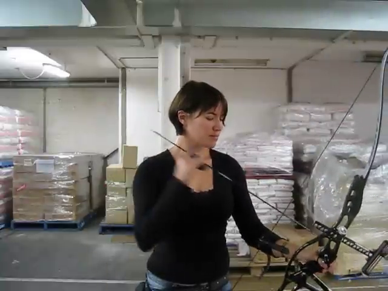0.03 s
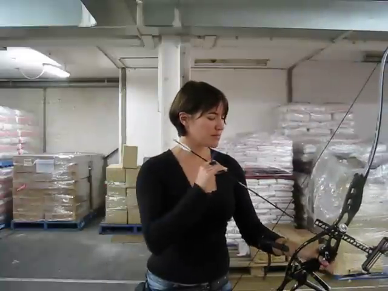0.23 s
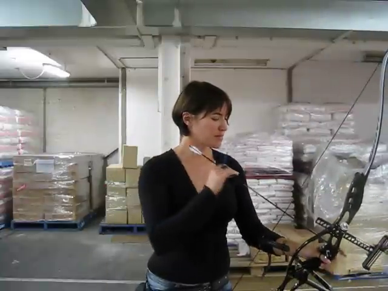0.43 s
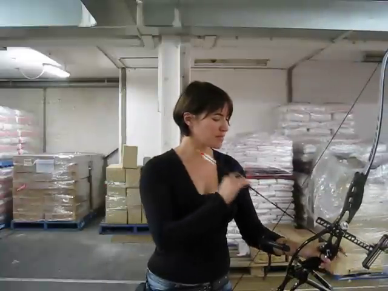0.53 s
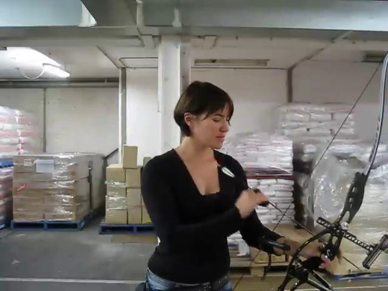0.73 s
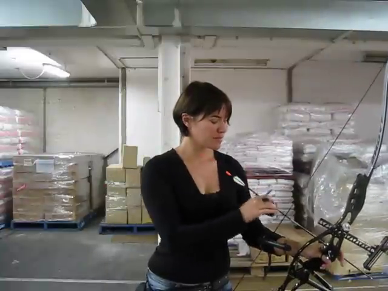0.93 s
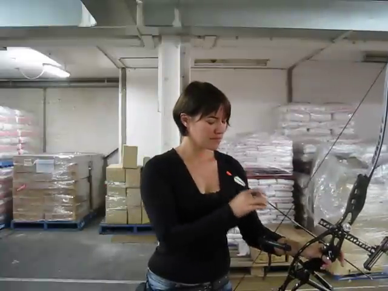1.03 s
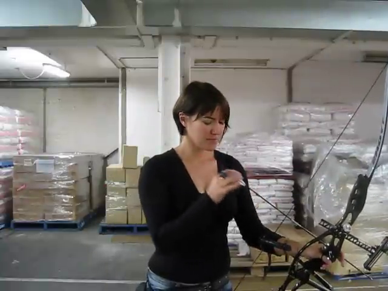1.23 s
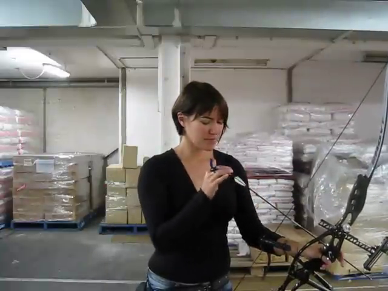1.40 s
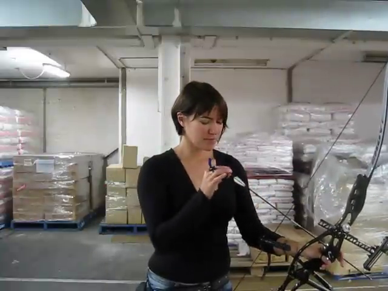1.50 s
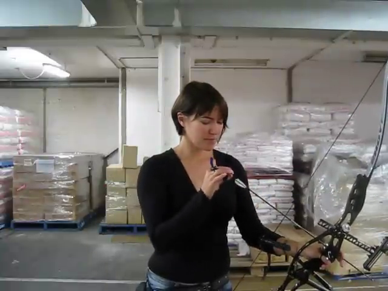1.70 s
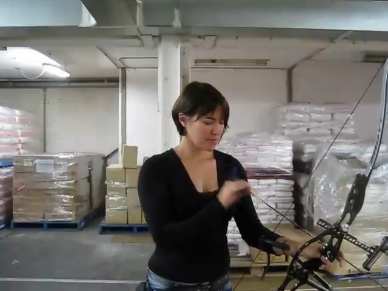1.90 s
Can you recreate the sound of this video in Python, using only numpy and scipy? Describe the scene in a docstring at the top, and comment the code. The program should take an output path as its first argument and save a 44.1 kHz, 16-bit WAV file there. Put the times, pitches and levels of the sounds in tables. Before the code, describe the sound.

Two sharp, close clacks of an arrow shaft hitting a bow and its metal rest ring out in a large warehouse. A brief rattle and two thin, faint scrapes of the shaft follow, over quiet, steady ventilation.

```python
"""Two sharp clacks, close to the microphone, over the hum of a large warehouse's ventilation:
an arrow shaft knocks against a compound bow. It drops onto the metal arrow rest, rattles,
and is slid along it twice with a thin hiss of friction. Each blow sets shaft, bow or rest ringing;
the hall rings on behind. On the hardest blows the recorder overloads with a low thump
and its limiter ducks."""
import sys
import numpy as np
from scipy import signal
from scipy.fft import rfft, irfft
from scipy.io import wavfile

SR = 44100
rng = np.random.default_rng(int(sys.argv[2]) if len(sys.argv) > 2 else 0)


def pcm_store(signal):
    """Save signal as 16-bit PCM."""
    levels = np.round(np.clip(np.atleast_2d(signal), -1, 1) * 32767)
    wavfile.write(sys.argv[1], SR, levels.astype(np.int16).T)


N = 85995
TIME = np.arange(N) / SR
BIN_HZ = np.arange(N // 2 + 1) * SR / N


def from_db(db):
    """Decibels to gain."""
    return 10 ** (np.asarray(db) / 20)


def unit_rms(x):
    """Scale to unit rms."""
    return x / np.sqrt(np.mean(x ** 2) + 1e-20)


def at_hz(points, hz, column=1):
    """Read a column of a table on a log-frequency axis."""
    table = np.array(points)
    return np.interp(np.log(np.maximum(hz, 1)), np.log(table[:, 0]), table[:, column])


def convolve(x, response):
    """Pass a sound through an impulse response."""
    return signal.fftconvolve(x, response)[:N]


def colour(x, points, size=8192):
    """Minimum-phase filter with the given spectral shape and unit power gain."""
    gain = unit_rms(from_db(at_hz(points, np.linspace(0, SR / 2, size // 2 + 1))))
    cepstrum = irfft(np.log(gain))
    cepstrum[1:size // 2] *= 2
    cepstrum[size // 2 + 1:] = 0
    return convolve(x, irfft(np.exp(rfft(cepstrum))))


def decay(t60):
    """An envelope that falls 60 dB in t60 seconds."""
    return np.exp(-np.log(1000) * TIME / t60)


def ring(modes):
    """The response to one tap: decaying sines of alternating sign."""
    return sum((-1) ** k * from_db(db) * decay(t60) * np.sin(2 * np.pi * hz * TIME)
               for k, (hz, db, t60) in enumerate(modes))


def drift(rate_hz):
    """Slow random wander at unit rms."""
    return unit_rms(irfft(rfft(rng.standard_normal(N)) / (1 + (BIN_HZ / rate_hz) ** 2), N))


def burst(t60, passes=4):
    """A dying spray of tiny clicks with an even spectrum."""
    envelope = decay(t60)
    spray = rng.standard_normal(N) * envelope
    for _ in range(passes):
        flattened = irfft(np.exp(1j * np.angle(rfft(spray))), N)
        spray = flattened * decay(10 * t60)
    return unit_rms(spray) * np.sqrt(np.mean(envelope ** 2))


# Spectrum of the air noise filling the warehouse: frequency_hz, relative_db
AIR_SPECTRUM = [(15, -60), (25, -8.5), (86, -1.5), (221, -2), (349, -3), (495, -5), (782, -5), (848, -6),
                (970, -6.5), (1050, -7.5), (3720, -13), (6730, -19.5), (7910, -28.5), (9050, -22.5),
                (15500, -21.5)]
# Fan tones in the background: pitch_hz, rms_db
FAN_TONES = [(90, -73.5), (135, -68.5), (799, -72.5), (1000, -65), (3598, -68.5)]
def ventilation(air_db=-52, waver_depth=0.26, waver_hz=11):
    """Room tone: steady air noise and fan tones that waver in level and phase."""
    air = from_db(air_db) * unit_rms(colour(rng.standard_normal(N), AIR_SPECTRUM))
    for hz, db in FAN_TONES:
        waver = 1 + waver_depth * (drift(waver_hz) + 1j * drift(waver_hz))
        tone = np.real(waver * np.exp(2j * np.pi * hz * TIME))
        air += from_db(db) * unit_rms(tone)
    return air


# Reverberation returning from the hall: frequency_hz, level_db, t60_s
HALL_REVERB = [(300, -43, 1.0), (1190, -2, 2), (2570, -3.5, 1.21), (4900, -2, 1.02), (8750, -7, 0.5),
               (11460, -13, 0.52), (15000, -8.5, 0.55)]
def warehouse(x, near_db=-7.5, near_delay_s=0.0038, hall_delay_s=0.0014, build_s=0.004):
    """Close reflections off archer, bow and floor, and a diffuse tail whose treble dies first."""
    white = rfft(rng.standard_normal(N))
    near = np.roll(burst(t60=0.024), int(near_delay_s * SR))
    response = from_db(near_db) * unit_rms(near)
    build = 1 - np.exp(-np.maximum(TIME - hall_delay_s, 0) / build_s)
    edges_hz = np.geomspace(150, 18000, 15)
    for low, high in zip(edges_hz, edges_hz[1:]):
        centre = np.sqrt(low * high)
        band = irfft(white * (BIN_HZ >= low) * (BIN_HZ < high), N)
        envelope = unit_rms(build * decay(at_hz(HALL_REVERB, centre, column=2)))
        response += from_db(at_hz(HALL_REVERB, centre)) * envelope * band
    return convolve(x, response / np.sqrt(N))


# Two strokes of the shaft along the rest: time_s, hiss_db, rest_ring_db, scrape_db
SLIDE_LEVELS = [(0.54, -74, -57, -71), (0.60, -39.5, -41, -56), (0.625, -49, -61, -45),
                (0.66, -52, -84, -73), (0.73, -55.5, -60, -70), (0.785, -49, -60, -70),
                (0.86, -52, -74, -70), (0.90, -77, -100, -95.5), (1.64, -75, -90.5, -83),
                (1.71, -59, -80, -61.5), (1.82, -50.5, -79, -53.5), (1.87, -49.5, -83, -51),
                (1.90, -46, -76, -47), (1.95, -52, -73, -53)]
# Spectrum of the friction hiss: frequency_hz, relative_db
HISS_SPECTRUM = [(1500, -22), (3500, -5.5), (5100, -4), (6500, -6), (8400, -8.5), (9300, -2.5), (11200, -2),
                 (12600, 0), (13900, 3.5), (15500, -2.5)]
# Resonances of the scraping shaft: pitch_hz, relative_db, t60_s
SCRAPE_MODES = [(4470, -3, 0.015), (5060, -1, 0.01), (5400, -3.5, 0.015), (9230, -2, 0.005),
                (11270, 5, 0.0098), (12100, 1.5, 0.0083)]
# Modes of the metal rest, rubbed or struck: pitch_hz, relative_db, t60_s
REST_MODES = [(1260, -50, .2), (1750, -48, .22), (2640, -43, .08), (2930, -33, .3), (3110, -32, .13),
              (3450, -41, .08), (5550, -22, .015), (5712, -38, .08), (6020, -31, .02), (11700, -22, .008),
              (12800, -20, .008), (12130, -20, .02), (12270, -13, .02)]
def slide(grains_per_s=10000, spread_db=4.5, soft_hz=3500):
    """Faint even up close: friction grains hiss, scrape in the shaft and ring the rest's low modes."""
    time_s, hiss_db, ring_db, scrape_db = np.transpose(SLIDE_LEVELS)
    grains = (rng.random(N) < grains_per_s / SR) * rng.choice([-1, 1], N)
    grains = grains * from_db(spread_db * rng.standard_normal(N))
    soft_grains = signal.sosfilt(signal.butter(2, soft_hz, fs=SR, output="sos"), grains)
    layers = [(hiss_db, colour(grains, HISS_SPECTRUM)),
              (ring_db, convolve(soft_grains, ring(REST_MODES))),
              (scrape_db, convolve(grains, ring(SCRAPE_MODES)))]
    friction = sum(from_db(np.interp(TIME, time_s, db)) * unit_rms(sound) for db, sound in layers)
    return friction * (TIME > time_s[0])


def clacks(hits, modes, crack_spectrum, crack_t60_s, thump_hz=486, thump_t60_s=0.0033):
    """Each blow is a brief crack and ringing modes; softer contacts are duller."""
    out = np.zeros(N)
    body = ring(modes)
    overload_thump = ring([(thump_hz, 0, thump_t60_s)])  # the recorder overloading on the hardest clacks
    for start_s, ring_db, crack_db, thump_db, cutoff_hz in hits:
        crack = colour(burst(crack_t60_s), crack_spectrum)
        blow = from_db(ring_db) * body + from_db(crack_db) * crack + from_db(thump_db) * overload_thump
        contact = signal.butter(2, min(cutoff_hz, 0.48 * SR), fs=SR, output="sos")
        start = int(start_s * SR)
        out[start:] += signal.sosfilt(contact, blow)[:N - start]
    return out


# Landing and bounces on the rest: start_s, ring_db, crack_db, overload_thump_db, cutoff_hz
REST_HITS = [(0.4841, -0.5, -8.5, -27, 19200), (0.4886, -49, -19, -58, 9900),
             (0.5215, -11.5, -24, -52, 8100), (0.5260, -1.5, -12.5, -64, 2540),
             (0.6150, -18, -33, -60, 20100), (0.6200, -20, -20.5, -64, 7800)]
# Contact crack on the rest: frequency_hz, relative_db
REST_CRACK = [(300, -23), (1400, -18), (2800, 1.5), (3900, -3.5), (5500, 1.5), (7300, -5.5), (10000, -0.5),
              (12300, 10.5), (15500, -10)]
def rest_rattle():
    """Near the microphone, the shaft drops and bounces on the metal rest, which rings."""
    return clacks(REST_HITS, REST_MODES, REST_CRACK, crack_t60_s=0.012)


# Blows against the bow: start_s, ring_db, crack_db, overload_thump_db, cutoff_hz
BOW_HITS = [(0.2248, 2.5, -2.5, -13.5, 21600), (0.2815, -13.5, -10.5, -50, 18900),
            (0.2872, -21, -16.5, -49, 7000)]
# Modes of shaft and bow: pitch_hz, relative_db, t60_s
BOW_MODES = [(2091, -37, 0.11), (2573, -22.5, 0.034), (3265, -27, 0.044), (4855, -15.5, 0.028),
             (5200, -39, 0.065), (5300, -28, 0.06), (5670, -23, 0.047), (6180, -29, 0.055),
             (8750, -18, 0.018), (10420, -42, .02), (11130, -6, 0.0094), (11310, -4, 0.015),
             (11250, -24, .04)]
# Contact crack on the bow: frequency_hz, relative_db
BOW_CRACK = [(300, -28), (1600, -13), (2500, 1), (3900, -6), (5200, 6.5), (7300, -1.5), (9000, 4),
             (11000, 14), (13000, 4.5), (15500, 0.5)]
def bow_knocks():
    """In the foreground, the shaft hits the bow hard, then lightly; both ring briefly."""
    return clacks(BOW_HITS, BOW_MODES, BOW_CRACK, crack_t60_s=0.013)


def scene():
    """One microphone near the bow, with the hall and its ventilation behind."""
    arrow = bow_knocks() + rest_rattle() + slide()
    return (arrow + warehouse(arrow) + ventilation())[None]


def record(dry, limit_db=-7.5, attack_s=0.00095, release_db_per_s=148, ceiling=0.6):
    """The limiter ducks after loud peaks; soft clipping, a notch and a steep low-pass follow."""
    notch_hz, notch_width_hz, cutoff_hz = 7860, 680, 15700
    over_db = np.maximum(20 * np.log10(np.abs(dry) + 1e-9) - limit_db, 0)
    release_db = release_db_per_s * TIME
    held_db = np.maximum.accumulate(over_db + release_db, axis=-1) - release_db
    pole = np.exp(-1 / (attack_s * SR))
    duck_db = signal.lfilter([1 - pole], [1, -pole], held_db)
    limited = dry * from_db(-duck_db)
    rounded = ceiling * np.tanh(limited / ceiling)
    notched = signal.lfilter(*signal.iirnotch(notch_hz, notch_hz / notch_width_hz, fs=SR), rounded)
    return signal.sosfilt(signal.ellip(10, 0.2, 75, cutoff_hz, fs=SR, output="sos"), notched)


dry = scene()
out = record(dry)
pcm_store(out)
```